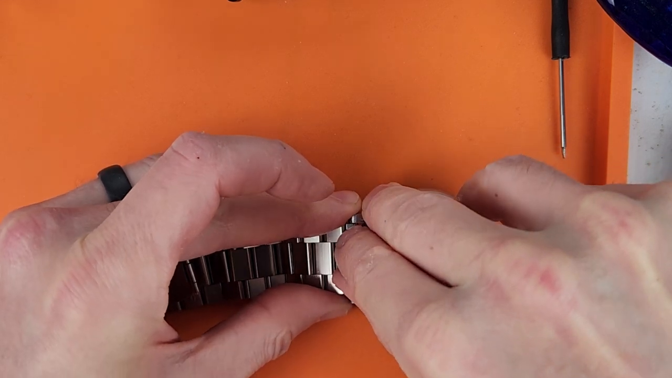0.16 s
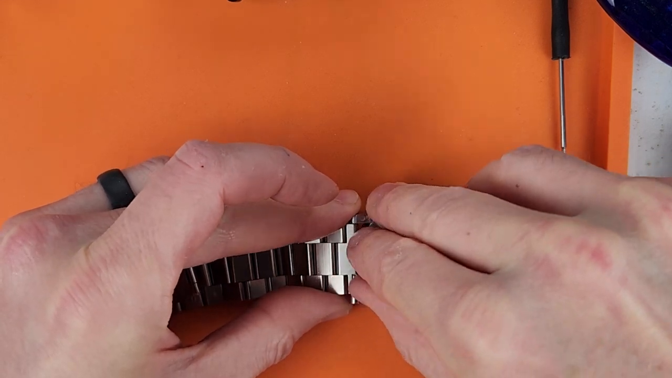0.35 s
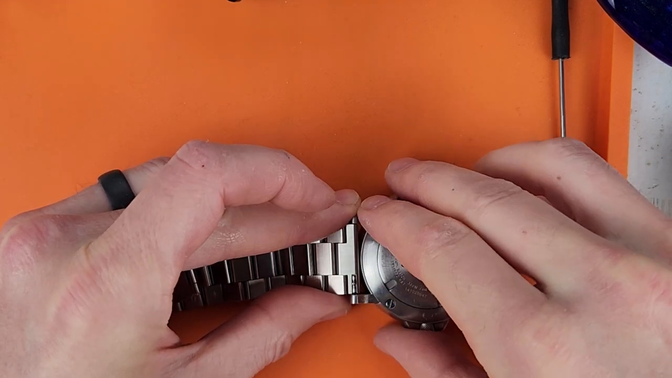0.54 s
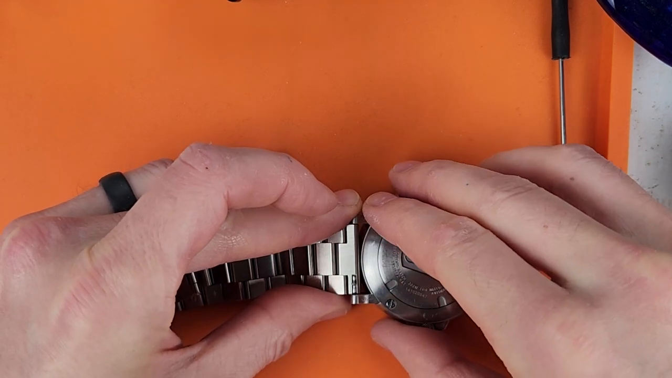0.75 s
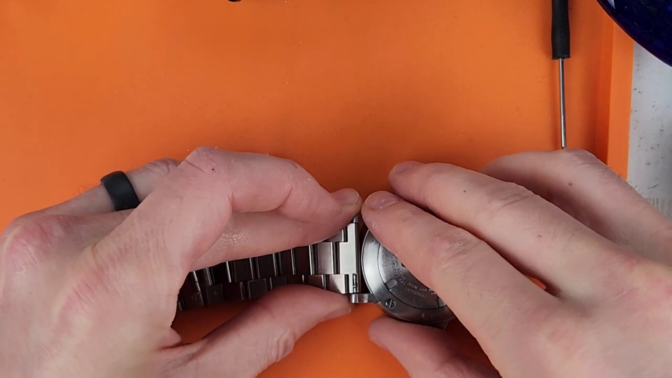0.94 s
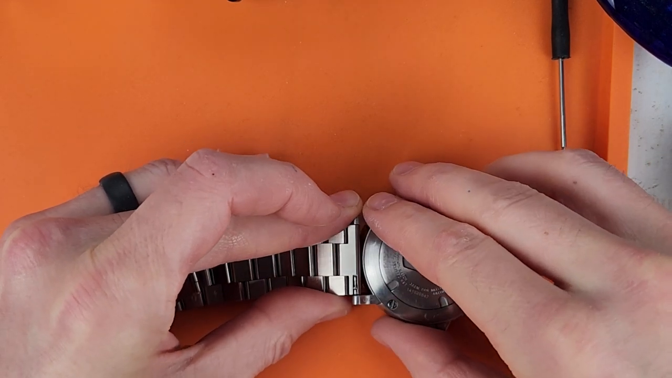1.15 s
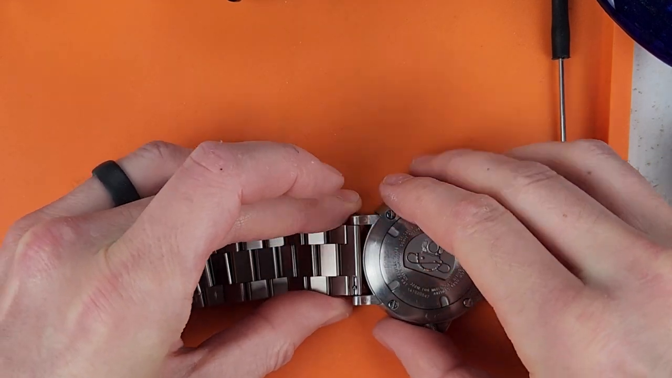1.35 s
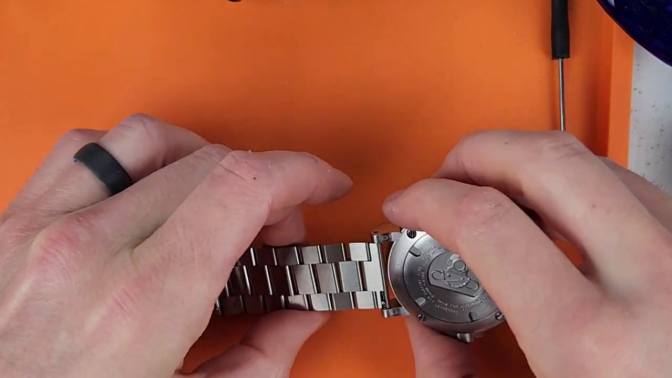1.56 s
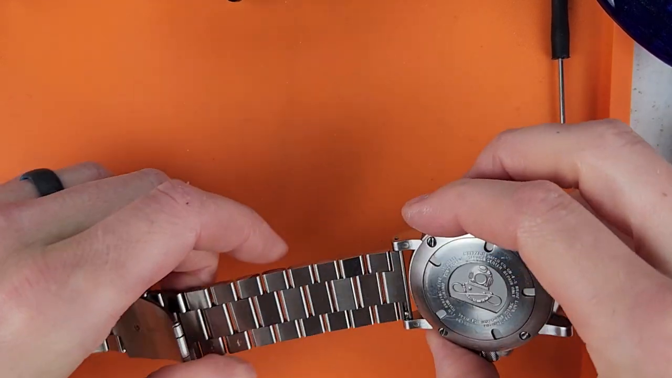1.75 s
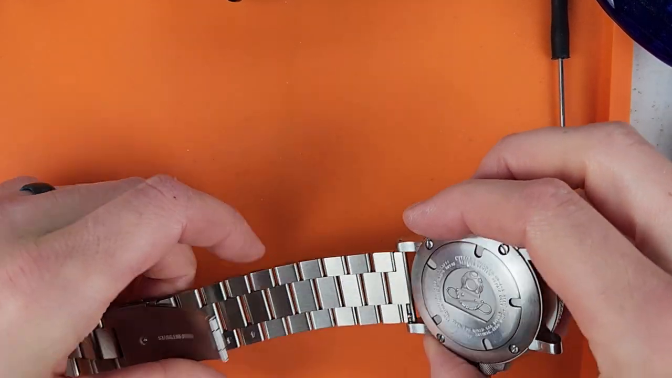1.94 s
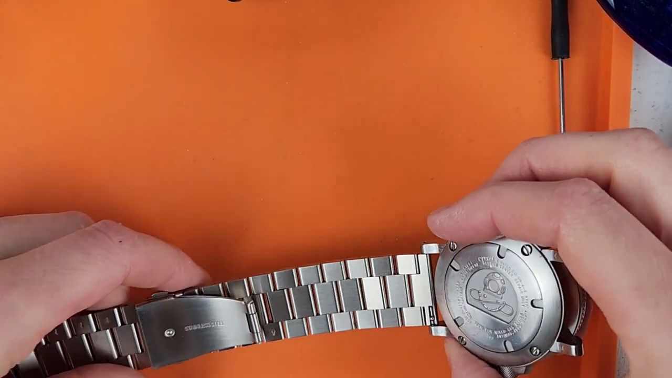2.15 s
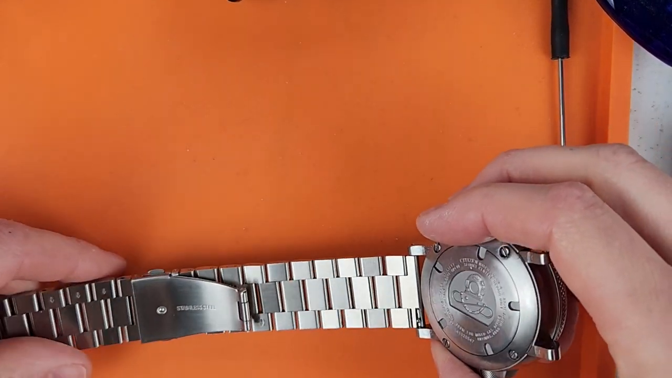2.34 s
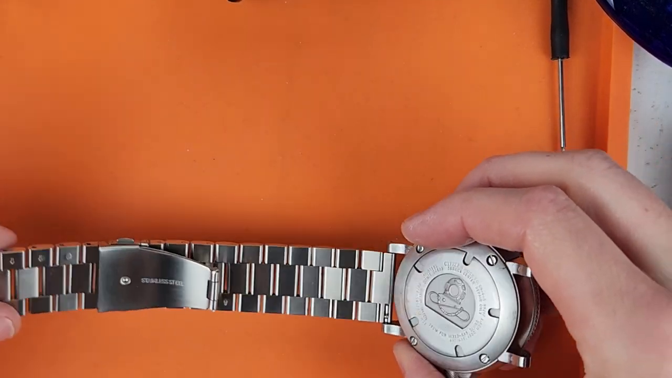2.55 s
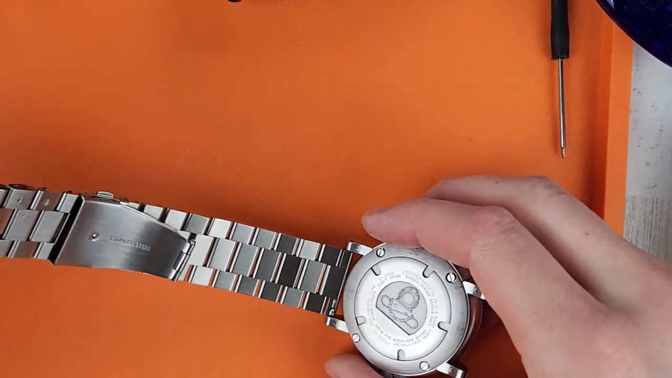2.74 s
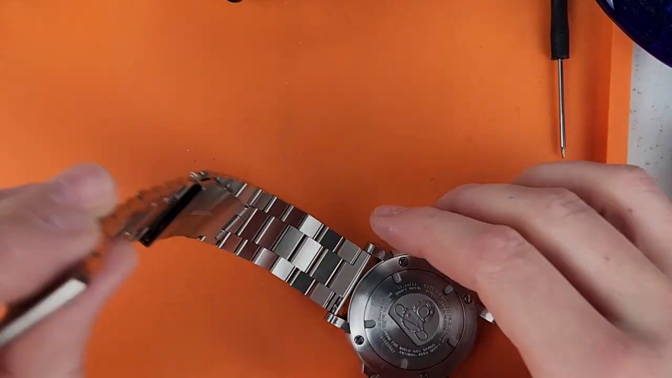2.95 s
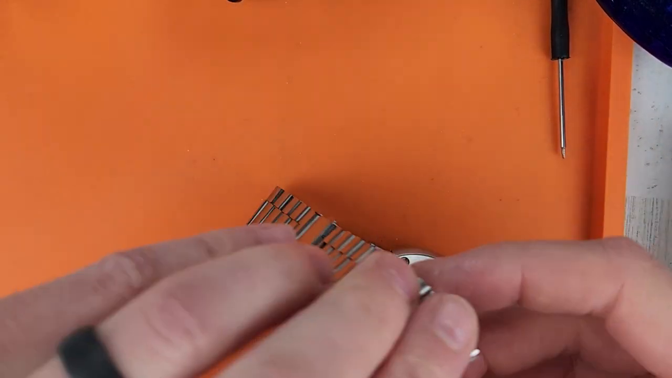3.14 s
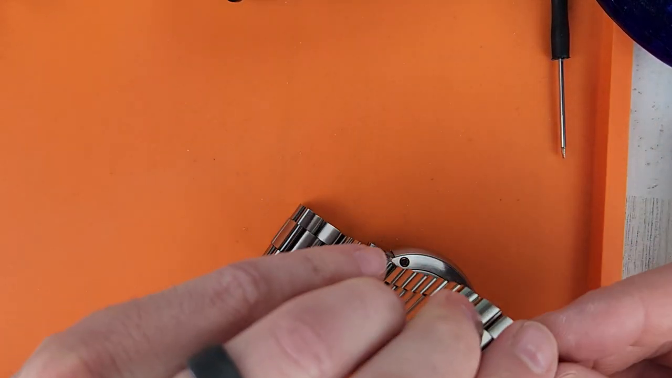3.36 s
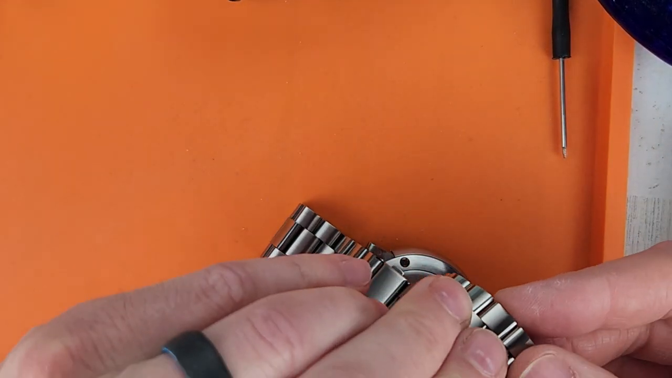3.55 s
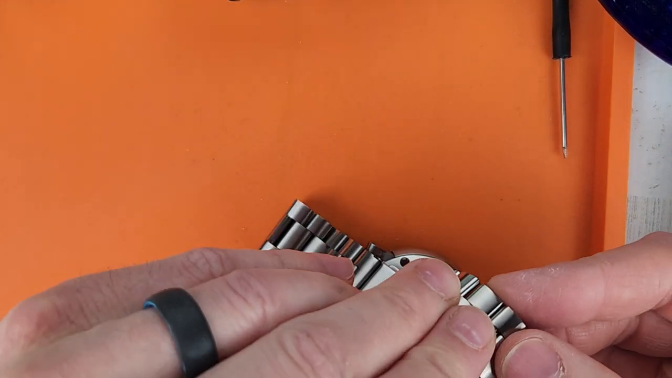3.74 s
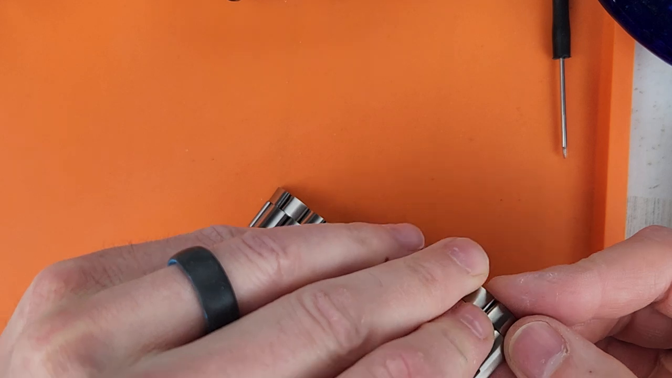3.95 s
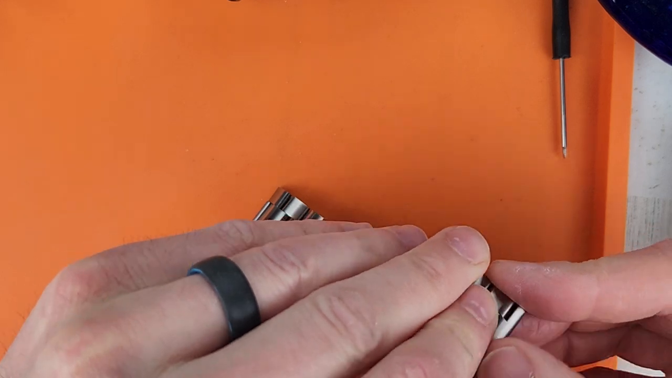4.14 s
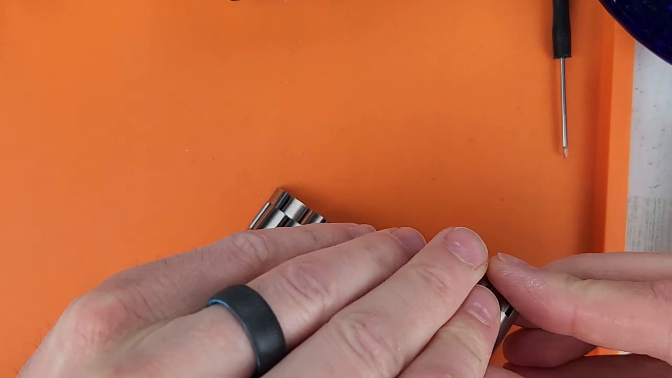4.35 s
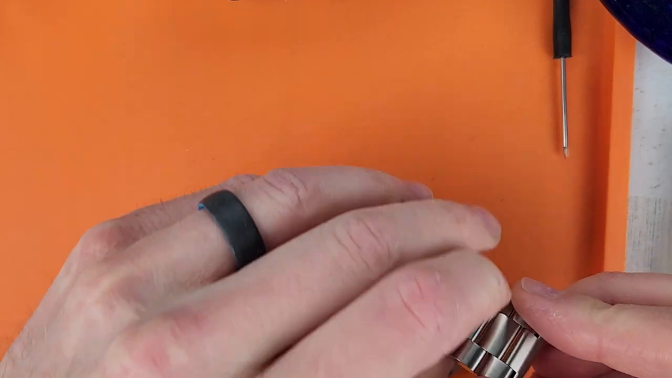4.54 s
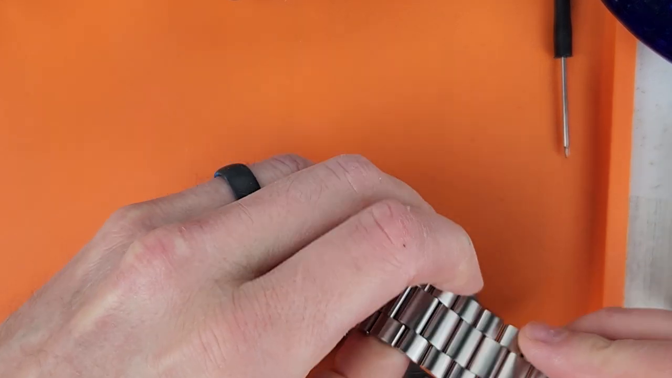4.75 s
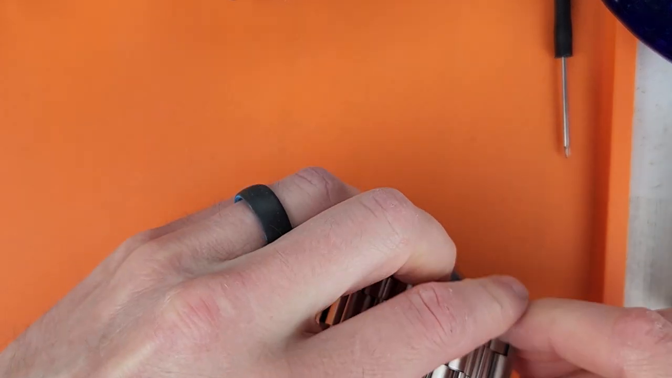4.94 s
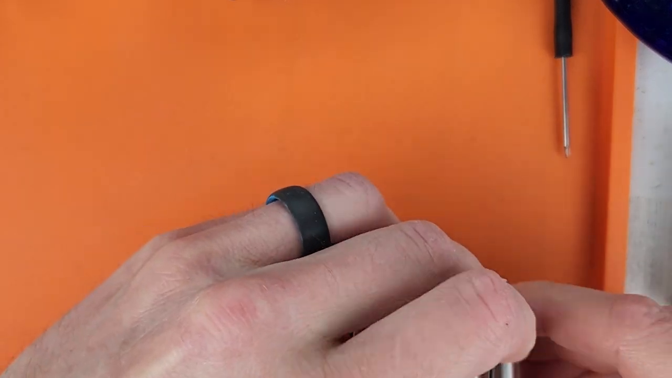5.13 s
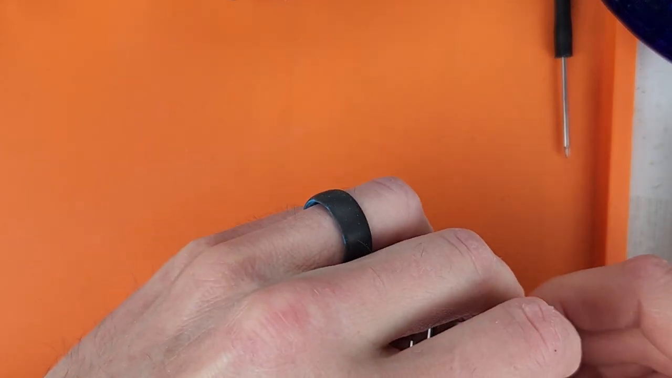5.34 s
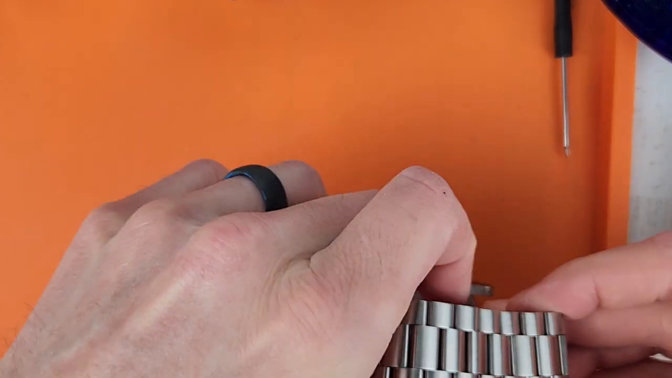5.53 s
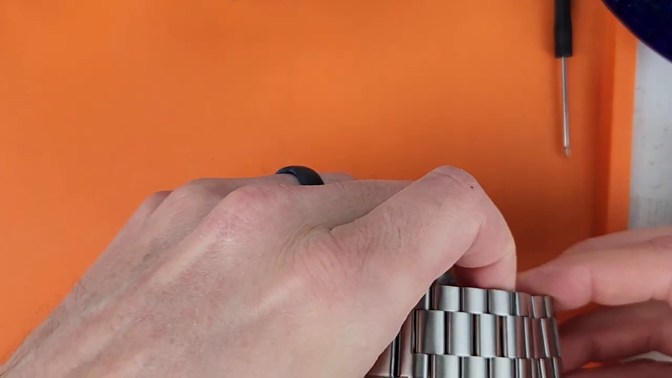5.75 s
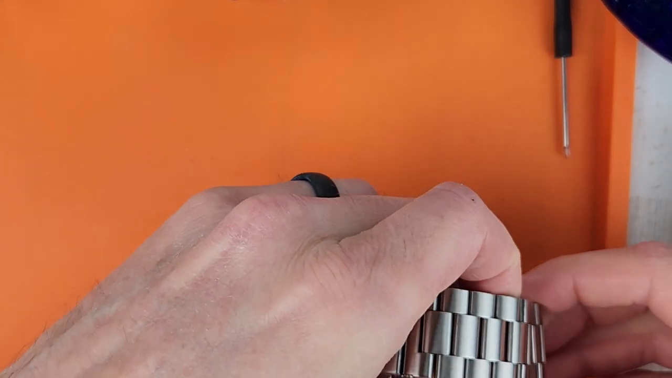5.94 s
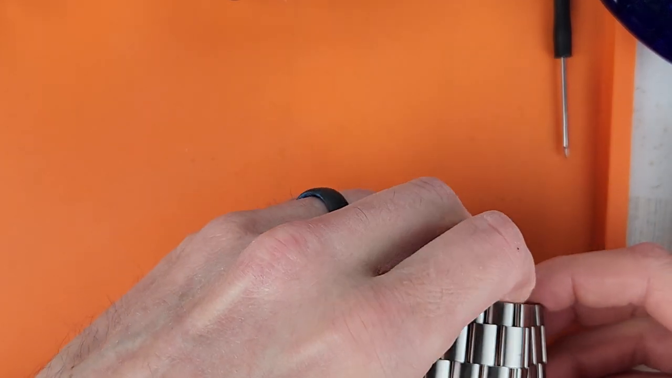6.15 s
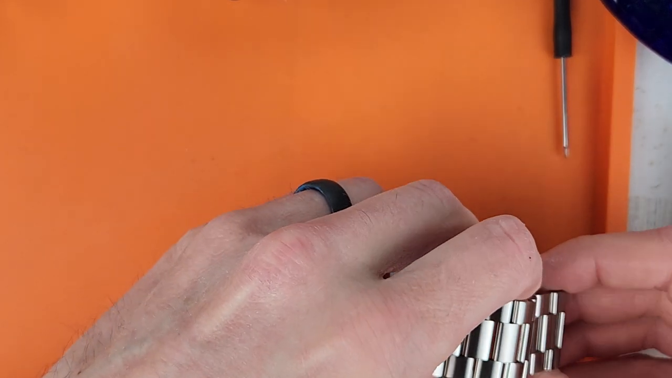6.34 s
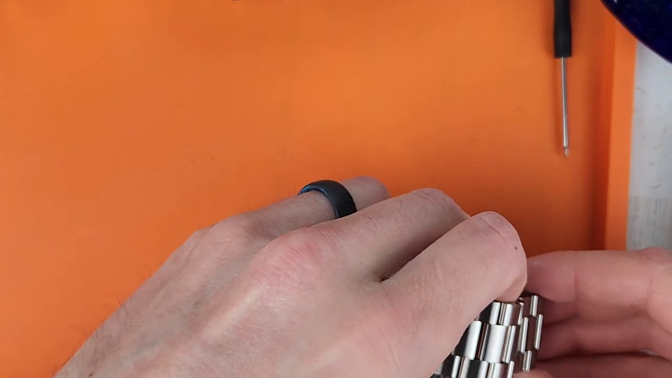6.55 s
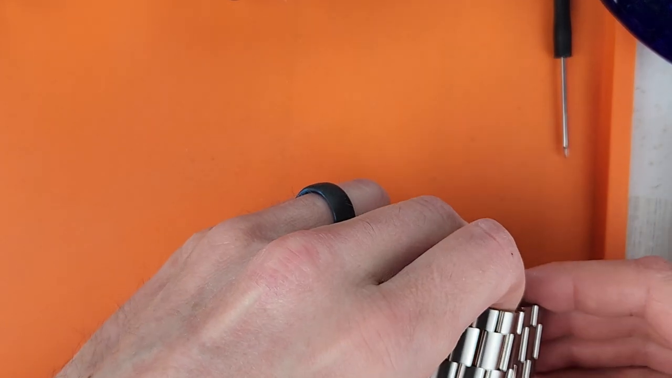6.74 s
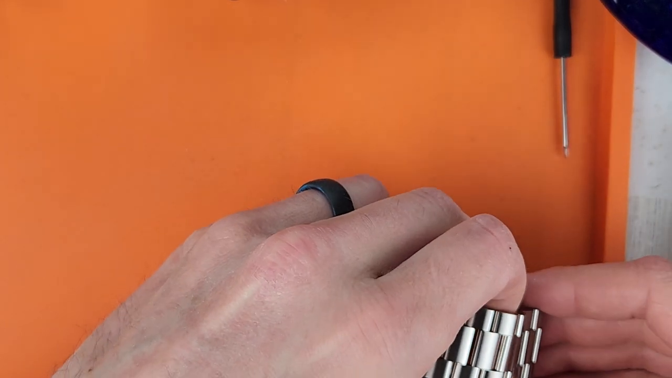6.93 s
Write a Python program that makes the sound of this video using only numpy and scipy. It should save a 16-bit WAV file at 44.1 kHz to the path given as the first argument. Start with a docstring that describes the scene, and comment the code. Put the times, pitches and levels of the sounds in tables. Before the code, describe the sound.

Soft metallic ticks and tiny squeaks of a link bracelet being turned, broken by a single sharp knock and thump on a matted table.

```python
"""The links of a steel bracelet click and squeak as hands turn it over a rubber mat in a quiet room.
Impacts and stick-slip jerks excite damped modes of the links; knocks ring the watch case and thumps the table.
Skin and steel rustle as shaped noise with scattered tiny contacts; the sharp sounds reflect and reverberate.
Behind them lie room air and microphone hiss, both coloured noise, and a hum of wavering narrow tones."""
import sys
import numpy as np
from scipy import signal
from scipy.fft import irfft
from scipy.io import wavfile
from scipy.ndimage import uniform_filter1d

SR = 44100
rng = np.random.default_rng(int(sys.argv[2]) if len(sys.argv) > 2 else 0)


def dump(signal):
    """Clip the signal to [-1, 1] and save it as 16-bit WAV at the path in sys.argv[1]."""
    limited = np.clip(np.atleast_2d(signal).T, -1, 1)
    pcm = np.round(limited * 32767).astype(np.int16)
    wavfile.write(sys.argv[1], SR, pcm)


N = 308259
STEADY_EDGE_HZ = 15950  # upper edge of the noise sounds


def gain_of(db):
    """Decibel law: 20 dB is a tenfold amplitude."""
    return 10 ** (np.asarray(db) / 20)


def read(points, hz):
    """Interpolation along a logarithmic frequency axis."""
    f, value = np.transpose(points)
    return np.interp(np.log(hz + 1), np.log(f + 1), value)


def sides(pan_db):
    """Level difference between the ears: left and right gain, half the decibels each way."""
    return gain_of(np.array([pan_db, -pan_db]) / 2)


def place(s, sound, db, pan_db):
    """Intensity panning: start sample, and the sound scaled on two channels."""
    return round(s * SR), sides(pan_db)[:, None] * gain_of(db) * sound


def add(mix, at, sound):
    """Superposition: overlapping sounds sum, cut off at the end of the mix."""
    part = mix[:, at:at + sound.shape[1]]
    part += sound[:, :part.shape[1]]


def ring(modes, detune, phase, size=2600):
    """Modal synthesis: an impulse response as a sum of exponentially dying sines."""
    t = np.arange(size) / SR
    return sum(gain_of(db - 60 * t / t60) * np.sin(2 * np.pi * (hz * d * t + p))
               for (hz, db, t60), d, p in zip(modes, detune, phase))


def noise(spectrum, same, lean_db, patchy_db, size=1024):
    """Partly coherent stereo noise from random short-time spectra with drifting patches; mean has rms 1."""
    frames, hz = 4 * N // size + 5, np.fft.rfftfreq(size, 1 / SR)
    a, b, c, d, patches = rng.standard_normal((frames, len(hz), 5)).T
    patches = uniform_filter1d(uniform_filter1d(patches, size=10, axis=0), size=10, axis=1)
    same = np.clip(read(same, hz), -1, 1)[:, None]
    left, other = a + 1j * b, c + 1j * d
    right = same * left + np.sqrt(1 - same ** 2) * other
    z = np.array([left, right]) * (hz < STEADY_EDGE_HZ)[:, None]
    z *= sides(read(lean_db, hz))[:, :, None]
    z *= gain_of(read(spectrum, hz)[:, None] + patchy_db * patches / patches.std())
    x = signal.istft(z, nperseg=size, noverlap=3 * size // 4)[1][:, :N]
    return x / x.mean(0).std()


# Spectrum of the room air. Each row: frequency in Hz, relative level in dB per Hz.
AIR_SPECTRUM = [(12, -17.5), (25, -5.5), (60, -4), (125, -10), (160, -4), (215, -14.5), (290, -4),
                (340, -8), (490, -22), (680, -10), (1020, -13), (1200, -18.5), (1440, -10), (1800, -26.5),
                (2120, -12.5), (2800, -35), (4000, -67.5)]
# Coherence of the background. Each row: frequency in Hz, left-right likeness from -1 to 1.
LIKENESS = [(60, 1), (180, 0.64), (550, 0.87), (1650, -0.38), (4970, -0.0), (15000, 0.19)]
# Balance of the background. Each row: frequency in Hz, left over right in dB.
BALANCE = [(60, 0.5), (150, 0.5), (380, 4), (950, 1.5), (2380, 3.5), (5980, 6), (15000, 17.5)]
AIR_DB = -68  # rms of the mean of both sides


def room_air():
    """Coloured noise: a random spectrum weighted mostly towards low frequencies, slowly patchy."""
    return gain_of(AIR_DB) * noise(AIR_SPECTRUM, LIKENESS, BALANCE, patchy_db=1.8, size=4096)


# Tones of the hum. Each row: frequency in Hz, steady core level in dB before panning,
# width of the wavering part in Hz.
HUM_TONES = [(57, -71.5, 4), (326, -81.5, 4.1), (515, -84.5, 4), (669.3, -78, 5), (780, -86.5, 5),
             (737, -83.5, 3), (1013, -86.5, 3.5), (1980, -87.5, 10)]


def hum():
    """Narrow-band noise around a steady sine: strength and phase wander at a rate set by the bandwidth."""
    out, t = np.zeros((2, N)), np.arange(N) / SR
    hz = np.fft.rfftfreq(2 ** 19, 1 / SR)
    for f, db, width in HUM_TONES:
        resonance = 1 / (1 + ((hz - f) / width * 2) ** 2)
        random_phases = np.exp(2j * np.pi * rng.random((2, len(hz))))
        a, b = irfft(random_phases * resonance)[:, :N]
        left = .4 * a / a.std() + np.sin(2 * np.pi * f * t)
        other = b / b.std()
        same = np.clip(read(LIKENESS, f), -1, 1)
        right = same * left + np.sqrt(1 - same ** 2) * other
        out += gain_of(db) * sides(read(BALANCE, f))[:, None] * [left, right]
    return out


# Spectrum of the microphone hiss. Each row: frequency in Hz, relative level in dB per Hz.
HISS_SPECTRUM = [(1530, -34), (2600, -9), (2780, -9), (3070, -3), (4030, -14), (5220, -5), (6600, -12.5),
                 (8740, -11), (9080, -24), (10700, -23), (11700, -12.5), (12600, -11.5), (15900, -19.5)]
HISS_DB = -80.5  # rms of the mean of both sides


def hiss():
    """Coloured noise: a random spectrum weighted towards the treble."""
    return gain_of(HISS_DB) * noise(HISS_SPECTRUM, LIKENESS, BALANCE, patchy_db=-1.8)


# Thumps through the mat. Each row: start in seconds, peak level in dB before panning,
# lift of the modes above 120 Hz in dB, decay time of the watch's rocking in seconds.
THUMP_EVENTS = [(0.913, -46.5, -5.5, 0.0084), (1.51, -54.5, 14, .01), (1.89, -47, 17, 0.02),
                (2.778, -37, -6.5, 0.0062), (2.9, -24, -1, 0.014), (2.943, -32, 0, 0.043),
                (3.025, -37.5, 0.5, .03), (3.11, -43, -11, 0.048), (3.221, -48.5, -8, 0.052),
                (3.31, -50, -8, .05), (3.77, -53.5, 3.5, 0.011), (3.86, -51.5, -0.5, 0.048),
                (4.69, -57, 7, 0.022), (4.77, -58, 17, 0.0078), (5.681, -56, 4, 0.026)]
# Modes of the table top. Each row: frequency in Hz, level in dB before the lift, t60 in seconds.
TABLE_MODES = [(57, -9, 0.34), (90, -1, .09), (130.07, -5.5, 0.089), (161, -5, 0.11), (238, -2.5, 0.081),
               (296, -4.5, .07), (355, -7.5, 0.14), (423.8, -10.5, 0.044), (544.3, -12, 0.06)]


def thumps():
    """Forced vibration: one push and some random rocking ring the low modes of the table top."""
    out, t = np.zeros((2, N)), np.arange(18000) / SR
    for s, db, upper_db, rocking in THUMP_EVENTS:
        modes = [(hz, level + upper_db * (hz > 120), t60) for hz, level, t60 in TABLE_MODES]
        jolts = rng.standard_normal((2, 18000))
        pushes = 0.037 * (jolts[0] + 0.33 * jolts) * np.exp(-t / rocking)
        pushes[:, 0] += 1
        table = ring(modes, np.ones(9), np.arange(9) / 2 + .5, size=16000)
        sound = signal.fftconvolve(pushes, table[None], axes=1)
        add(out, *place(s, sound / abs(sound).max(), db, 1.4))
    return out


# Knocks on the watch case. Each row: time in seconds, peak level in dB before panning,
# left over right in dB, chatter of the contact in Hz.
KNOCK_EVENTS = [(0.9138, -41, 8.5, 2530), (2.7835, -36.5, 4, 2680), (2.9027, -2, 4, 2978),
                (3.8824, -65, -3, 3350), (5.5383, -48, 2, 2530), (6.6024, -53.5, 0.5, 3630),
                (6.933, -59, 6, 2750)]
# Modes of the case. Each row: frequency in Hz before the grip shifts it, relative level in dB, t60 in seconds.
CASE_MODES = [(560, -28, .05), (1042, -14, 0.0202), (1420, -11, 0.015), (2300, -6, 0.011),
              (2870, -8.5, 0.0041), (3170, 0, 0.0049), (3480, -1.5, .006), (5080, -6, 0.023),
              (6350, -6, .011), (13400, -5, .035)]


def knocks():
    """Impact excitation: a contact chatters for a few milliseconds, bounces weakly, and the case rings."""
    out, t = np.zeros((2, N)), np.arange(1500) / SR
    for s, db, pan_db, hz in KNOCK_EVENTS:
        jolts = rng.standard_normal(1500)
        chatter = (np.sin(2 * np.pi * hz * t) + .4 * jolts) * np.exp(-((t - .001) / .0005) ** 2)
        bounces = .11 * jolts * np.exp(-t / .011) * (t > .003)
        # the grip shifts the lower seven modes with the chatter
        held = np.where(np.arange(10) < 7, (hz / 3000) ** .8, 1)
        sound = signal.fftconvolve(chatter + bounces, ring(CASE_MODES, held, np.arange(10) / 2))
        both = np.array([sound, np.roll(sound, -2)])  # two samples earlier on the right
        add(out, *place(s - .0005, both / abs(sound).max(), db, pan_db))
    return out


# Modes of the links in a low, middle, high and top group. Each row: frequency in Hz before random
# retuning, relative level in dB, t60 in seconds before any lengthening.
LINK_MODES = [
    [(3750, -3.5, .005), (4665, -4, .005), (5300, -3, 0.0077)],
    [(6090, -2.5, 0.0017), (7570, -2, 0.003), (8150, -3, 0.002)],
    [(10150, -5.5, .003), (10700, -1.5, 0.0024), (12000, -4, 0.0066)],
    [(13600, -1, 0.00429), (14900, -8, 0.0037), (15350, -4, 0.0027)],
]


def links(groups_db, chance, blows, ringing=1.):
    """Convolution of tiny blows with modal groups; neighbouring modes swing in opposite sense."""
    out = 0
    for k, (db, group, (tune, turn)) in enumerate(zip(groups_db, LINK_MODES, chance)):
        modes = [(hz, level, ringing * t60) for hz, level, t60 in group]
        detune = 1 + .05 * (tune - .5)
        phase = (np.arange(3) + k) / 2
        other_side = phase + .7 * (turn - .5)
        rings = [ring(modes, detune, phase, size=600), ring(modes, detune, other_side, size=600)]
        # small parts radiate little under their modes
        radiation = signal.butter(2, 0.81 * group[0][0], "high", fs=SR)
        sound = signal.oaconvolve(blows, signal.lfilter(*radiation, rings), axes=1)
        out = out + gain_of(db) * sound / abs(sound).max(1, keepdims=True)
    return out


# Clicks of the links. Each row: start in seconds, peak of the middle modes in dB before panning,
# left over right in dB, then low, high and top modes against the middle ones in dB.
CLICK_EVENTS = [(0.9138, -29.5, 4, -4, 4, 9.5), (1.5025, -64, 6, -8, 6, -6), (1.522, -60, 2, -8, -2, -4),
                (1.5987, -55, 1, -17, -3, -7), (1.6277, -44.5, -5, -6, 7, 10), (1.654, -49.5, 4, -7, 5, -7),
                (1.6674, -56, -8, -11, -2, 1), (1.6864, -51, 2, -12, -12, -13), (1.784, -50, 0, -9, -1, -2),
                (1.897, -50.5, 1, -19, 1, 5), (1.911, -44.5, 2, -18, -26, -20),
                (1.946, -37.5, 4, -35, -17, -26), (1.9573, -38, -1, -30, -20, -17),
                (2.005, -50, 3.5, -21, -9, -18), (2.0225, -36, 5, -42, -15, -26),
                (2.0305, -53, 2, -16, -6, -10), (2.0448, -40.5, 2, -25, -12, -18),
                (2.0642, -45.5, 3.5, -6, -13, -21), (2.0968, -46.5, 7, -19, -27, -24),
                (2.3647, -51, -4, -21, 2, -1), (2.443, -70, 0, -22, 15, -2),
                (2.5694, -54.5, 10, -26, -3, -6), (2.6766, -57, 16, -25, -1, -1),
                (2.6943, -57, 4.5, -16, 4, -4), (2.757, -60, 0, -12, 0, 0), (2.7834, -42.5, -2, 5, -1, -3),
                (2.9035, -14, 1, -4, -1, 1), (3.031, -52, 3, 2, -11.5, 4), (3.2326, -28.5, -10, -26, -1, 8),
                (3.3075, -39.5, -5.5, -38, 3, -8), (3.3523, -49, -1, -12, 3, 2),
                (3.37, -47.5, 0, -21, -13, -18), (3.4278, -61, 1.5, -17, 12.5, -13),
                (3.5467, -58, 15, -21.5, -2, -6), (3.7643, -50, -7.5, -16, -21, -14.5),
                (3.883, -38.5, -7, -1, 1.5, 0), (4.349, -48, 4, -5.5, -32, -26.5),
                (4.5167, -50, -1.5, -17, -18.5, -31.5), (4.5357, -44, 0, -16.5, -22, -32),
                (4.6928, -35.5, -11, -15, -6.5, -6.5), (4.737, -51, -3, -3, 1, -2.5),
                (4.7876, -44, -0.5, -21, -7, -2), (4.9777, -56.5, -3, -4.5, -2, -5.5),
                (4.995, -39.5, -3.5, -7.5, 1, -1.5), (5.0474, -55, 5, -12, 1, 0),
                (5.1276, -37, -9.5, -30, -15, -24), (5.163, -57, 0, 2, -12, -14),
                (5.2057, -46, -3, -23, -15.5, -16), (5.5382, -32, -14, -10, 4, -0.5),
                (5.7052, -39, -10, -18, -9, -12), (5.7808, -40, 1, -30.5, -15.5, -23.5),
                (5.8711, -55, -3, -11, -4.5, -14.5), (5.9546, -43, -5, -21, -5.5, -25),
                (6.109, -59, 3, -10, -15, -15), (6.3899, -56, 7, -14, -23, -24.5),
                (6.6023, -55, 7, 5.5, -13.5, 0)]
# rattle decay of an evenly coloured click; the more the middle modes stand alone, the shorter
RATTLE_S, RATTLE_S_PER_DB = .0052, .00013


def clicks():
    """Repeated impact: a sharp first contact and a rattle of smaller ones die away exponentially."""
    out, t = np.zeros((2, N)), np.arange(1800) / SR
    onset = np.minimum(t / .0004, 1)
    contact = np.exp(-t / .0007) * onset
    for s, db, pan_db, low_db, high_db, top_db in CLICK_EVENTS:
        chance, jolts = rng.random((4, 2, 3)), rng.standard_normal((3, 1800))
        length = RATTLE_S + RATTLE_S_PER_DB * (low_db + top_db) / 2
        rattle = .3 * np.exp(-t / length) * onset
        blows = (contact + rattle) * (jolts[0] + .5 * jolts[1:])  # partly shared by both sides
        add(out, *place(s, links([low_db, 0, high_db, top_db], chance, blows), db, pan_db))
    return out


ECHO_S, ECHO_DB = .0055, -12


def echo(x):
    """Specular reflection: a nearby surface returns one delayed copy with the sides exchanged."""
    return gain_of(ECHO_DB) * np.roll(x[::-1], round(ECHO_S * SR), axis=1)


# Reverberation of the room. Each row: frequency in Hz, t60 in seconds.
ROOM_DECAY = [(1000, .15), (3000, 0.087), (8000, 0.13), (16000, 0.06)]


def room(x):
    """Diffuse reverberation: sparse taps of random sign, each frequency dying at its own speed."""
    taps = np.zeros((2, SR // 2))
    at = np.arange(60, SR // 2 - 20, 20)[:1000] + rng.integers(0, 20, (2, 1000))
    np.put_along_axis(taps, at, rng.choice([-1., 1.], at.shape), 1)
    hz, t, z = signal.stft(taps, SR, nperseg=256)
    decay = gain_of(-60 * t / read(ROOM_DECAY, hz)[:, None])
    tail = signal.istft(z * decay, SR, nperseg=256)[1]
    return signal.fftconvolve(x.mean(0)[None], tail / np.linalg.norm(tail[0]), axes=1)[:, :N]


# Slow level of skin and steel rubbing. Each row: time in seconds, level in dB before the stirring lift.
RUB_LEVEL = [(1.25, -89), (1.4, -75), (1.58, -78), (1.73, -68), (1.8, -71), (1.87, -75), (2.0, -75),
             (2.14, -66.5), (2.26, -73), (2.5, -84), (2.74, -78), (2.86, -76), (2.94, -52), (3.0, -62),
             (3.09, -69), (3.17, -80), (3.55, -85), (4.15, -76.5), (4.42, -84), (4.75, -78), (5.35, -75),
             (5.41, -69), (5.48, -79), (6.07, -74), (6.5, -80), (6.99, -79)]
# lift of the rustle around a click or slip of -45 dB, and its change per dB of that event
STIR_DB, STIR_SHARE = 10, .12
STIR_RISE_S, STIR_FALL_S = .035, .04


def rub_level(t):
    """Level envelope: the slow motion of the hands, lifted exponentially around every click and slip."""
    lift_db = np.zeros(len(t))
    for s, db, *_ in CLICK_EVENTS + SQUEAK_EVENTS:
        shape = np.exp(np.minimum((t - s) / STIR_RISE_S, (s - t) / STIR_FALL_S))
        lift_db = np.maximum(lift_db, (STIR_DB + STIR_SHARE * (db + 45)) * shape)
    return np.interp(t, *np.transpose(RUB_LEVEL), left=-120) + lift_db


# Spectrum of the rustle. Each row: frequency in Hz, relative level in dB per Hz.
RUSTLE_SPECTRUM = [(880, -27), (1500, 0), (1960, -7), (2530, -4.5), (3210, -5.5), (4670, -8.5), (5060, -6),
                   (7580, 1), (10900, -8), (11800, 0), (15900, -7.5)]
TICKS_PER_S, TICKS_DB = 140, -8.5  # tiny link contacts, level against the rustle
CENTRE_DB, LEFT_PER_DB = -67, .75  # loud rubbing lies in the middle; the fainter, the further left


def rubbing():
    """Friction noise: grainy rustle and a random train of tiny ticks share the level of the hands."""
    t = np.arange(N) / SR
    db = np.interp(t, t[::64], rub_level(t[::64]))
    grains = uniform_filter1d(uniform_filter1d(rng.standard_normal(N), size=300), size=300)
    likeness, balance = [(1000, .3), (16000, 0.19)], [(1000, 0.00081), (16000, 0.007)]
    rustle = noise(RUSTLE_SPECTRUM, likeness, balance, patchy_db=2.5)
    rustle = gain_of(1.454 * grains / grains.std()) * rustle

    strengths = gain_of(4. * np.minimum(rng.exponential(1, N), 4))
    starts = strengths * (rng.random(N) < TICKS_PER_S / SR)
    # each contact decays over 1.2 ms
    contacts = signal.lfilter([1], [1, -np.exp(-1 / (.0012 * SR))], starts)
    blows = contacts * rng.standard_normal((2, N))
    ticks = links([-6.5, -0.5, -4.5, -5], rng.random((4, 2, 3)), blows)[:, :N]
    ticks = signal.sosfilt(signal.butter(12, STEADY_EDGE_HZ - 300, fs=SR, output="sos"), ticks)

    pan = sides(LEFT_PER_DB * np.clip(CENTRE_DB - db, 0, 30))
    return gain_of(db) * pan * (rustle + gain_of(TICKS_DB) * ticks / ticks.std())


# Squeaks of slipping links. Each row: start in seconds, peak of the middle modes in dB before panning,
# left over right in dB, low modes and high modes against the middle ones in dB,
# length in seconds, mean slips per second.
SQUEAK_EVENTS = [(3.239, -42.5, 3.5, -23.5, -4, 0.066, 206), (3.853, -55.5, 1, 1, 1, 0.025, 304),
                 (4.681, -52, -3, 5, -5, 0.024, 298), (5.2, -56, -7, -8, -10, 0.031, 313),
                 (5.681, -48, -4.5, -2, -1, .022, 297), (5.823, -53, -5, -10.5, -3, 0.023, 308),
                 (6.186, -37.5, -7, -15.5, -17, 0.03, 312), (6.263, -37.5, -8.5, -10.5, -12, 0.022, 514),
                 (6.506, -68, 0, 6.5, -9, 0.031, 293), (6.685, -64.5, 0, 6.5, -9, 0.027, 309),
                 (6.737, -68.5, 1, 8.5, -4, 0.034, 299)]
TOP_DB = -3  # top modes of a slip against the high ones


def squeaks():
    """Stick-slip friction: uneven jerks swell quickly and fade; loose links ring longer."""
    out = np.zeros((2, N))
    for s, db, pan_db, low_db, upper_db, length, rate in SQUEAK_EVENTS:
        t = np.arange(0, length, 1 / SR)
        turns = rate * t + .15 * np.sin(2 * np.pi * (90 * t + rng.random()))
        swell = np.sin(np.pi * (t / length) ** .65)
        jerks = (.08 + np.exp(-(turns % 1) / .3)) * swell
        shared, separate = rng.standard_normal(len(t)), rng.standard_normal((2, len(t)))
        blows = jerks * (shared + 0.96 * separate)
        groups_db = [low_db, 0, upper_db, upper_db + TOP_DB]
        sound = links(groups_db, rng.random((4, 2, 3)), blows, ringing=1.4)
        add(out, *place(s, sound, db, pan_db))
    return out


def scene():
    """Superposition: direct sharp sounds, their reflections, thumps, rubbing and the background."""
    hits = knocks() + clicks() + squeaks()
    reflections = echo(hits) + gain_of(-4.0) * room(hits)
    background = room_air() + hum() + hiss()
    return hits + reflections + thumps() + rubbing() + background


EDGE_HZ = 16700


def record(dry):
    """Clipping at full scale, then band limitation by a linear-phase low-pass filter."""
    low_pass = signal.firwin(511, EDGE_HZ, window=("kaiser", 9), fs=SR)
    return signal.oaconvolve(np.clip(dry, -1, 1), low_pass[None], "same")


dry = scene()
out = record(dry)
dump(out)
```